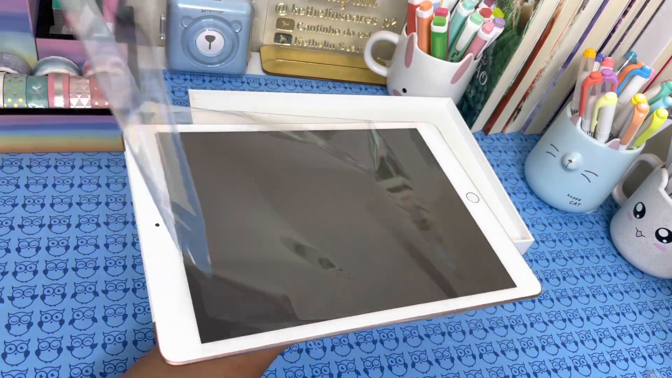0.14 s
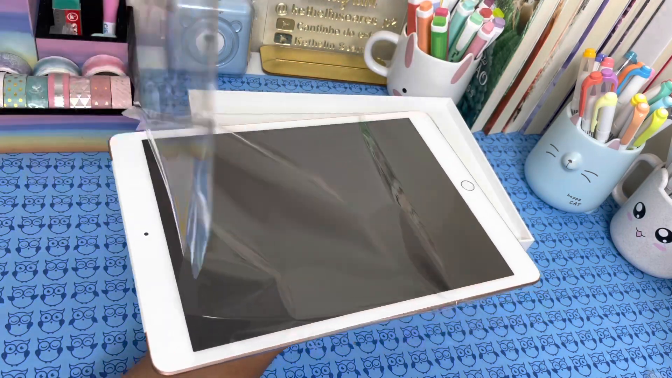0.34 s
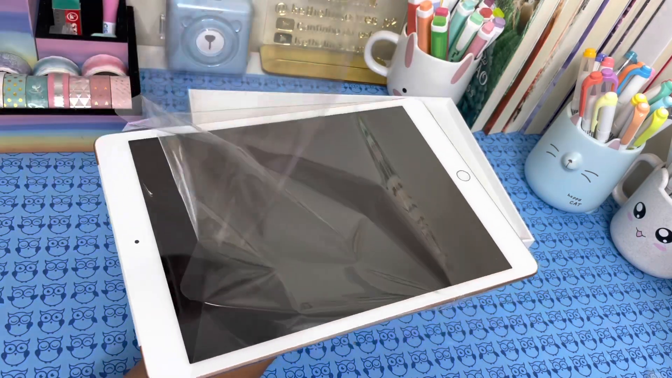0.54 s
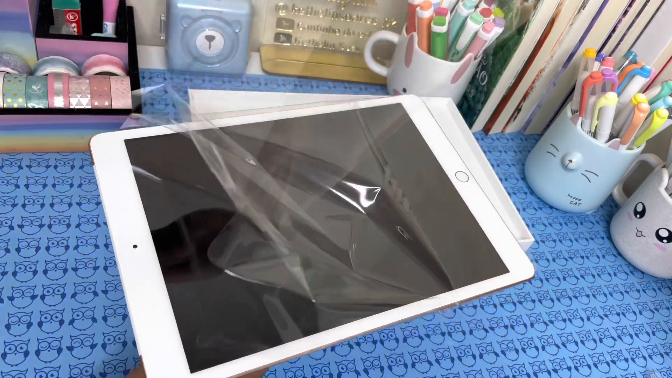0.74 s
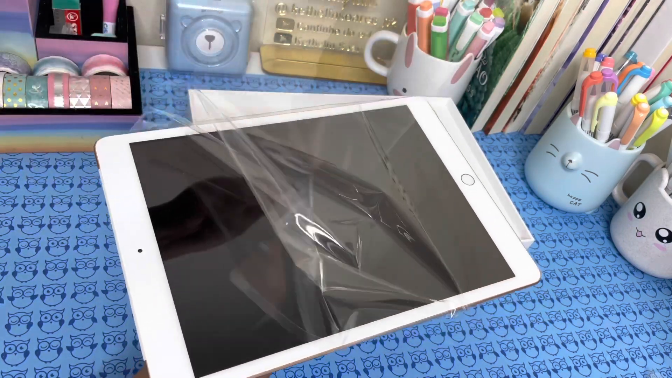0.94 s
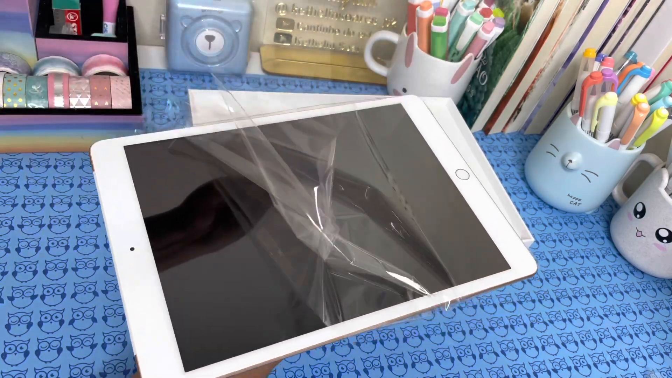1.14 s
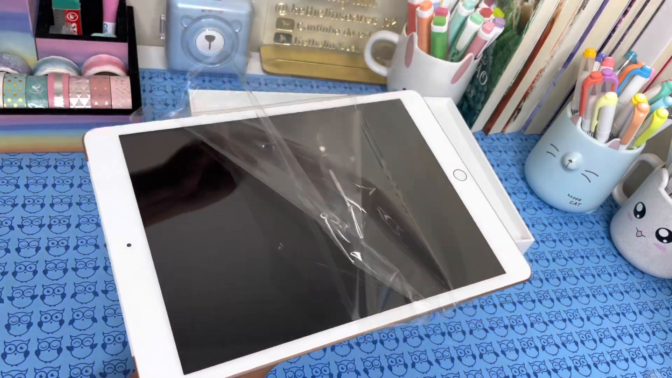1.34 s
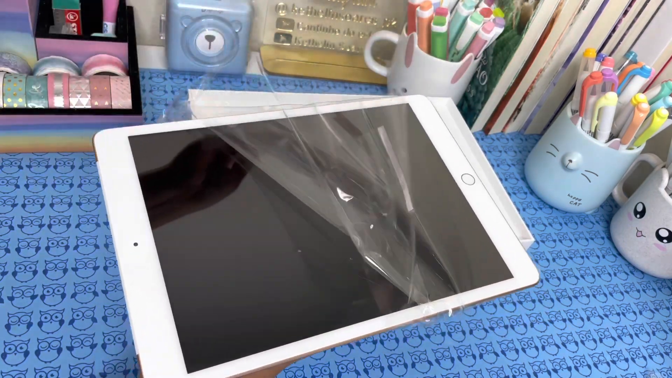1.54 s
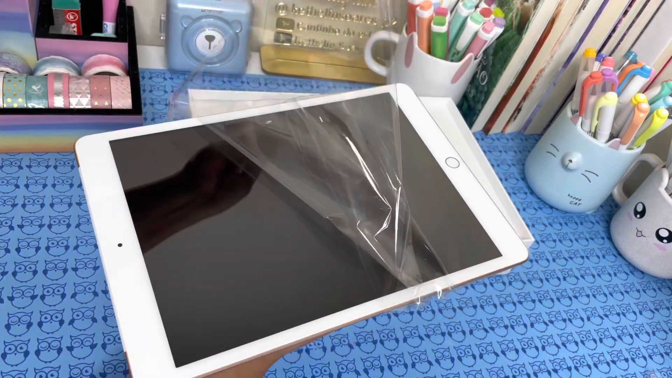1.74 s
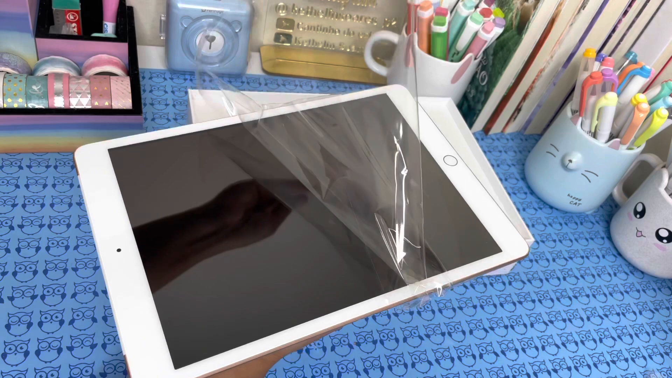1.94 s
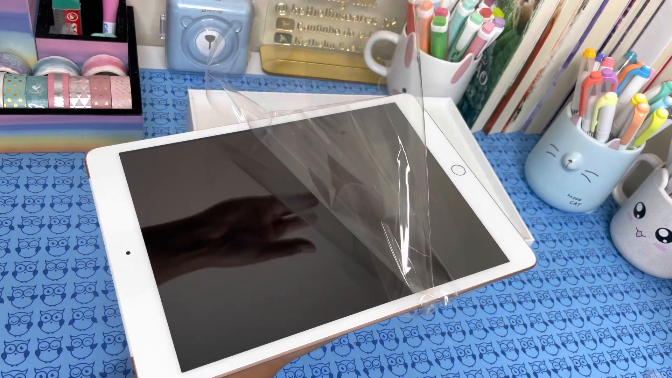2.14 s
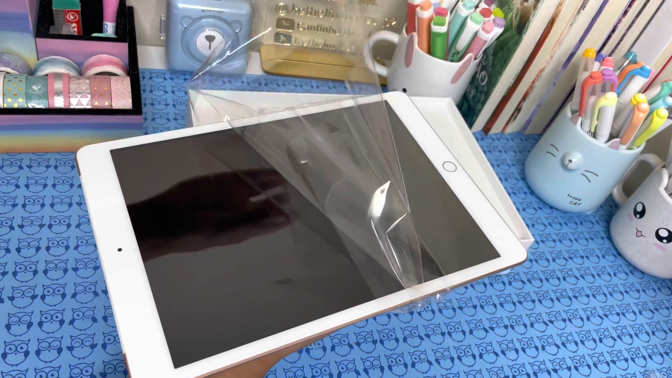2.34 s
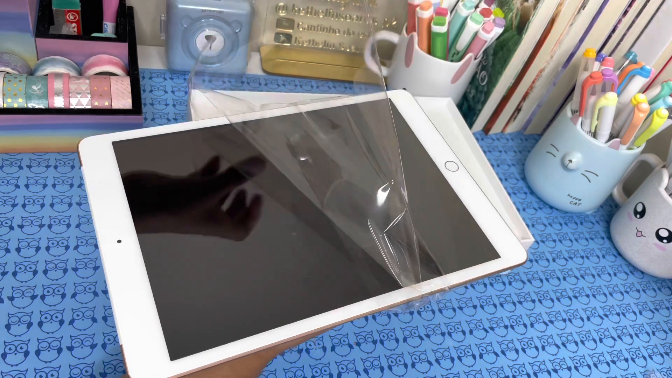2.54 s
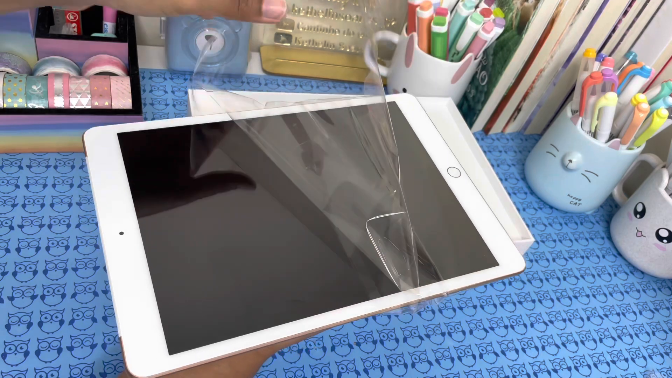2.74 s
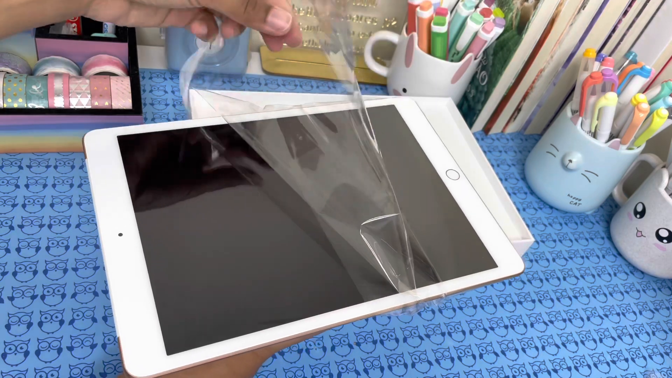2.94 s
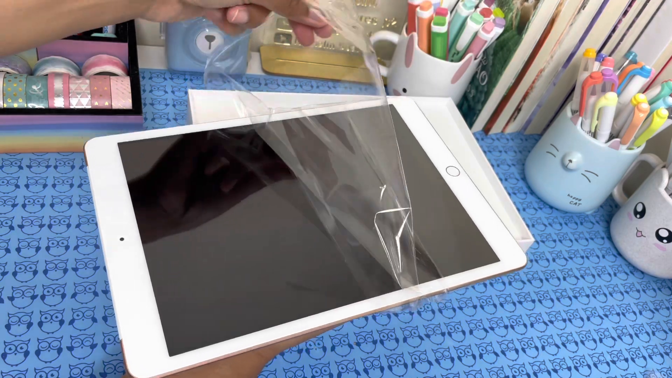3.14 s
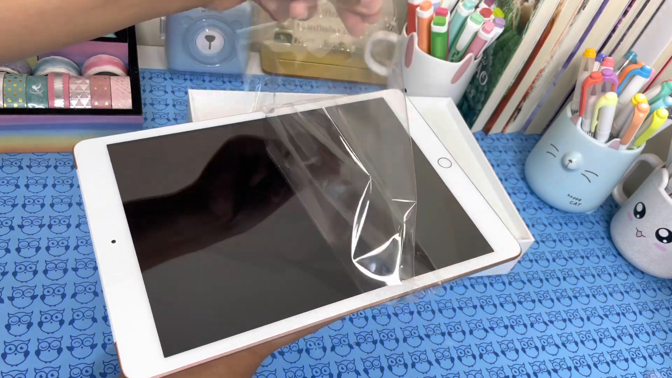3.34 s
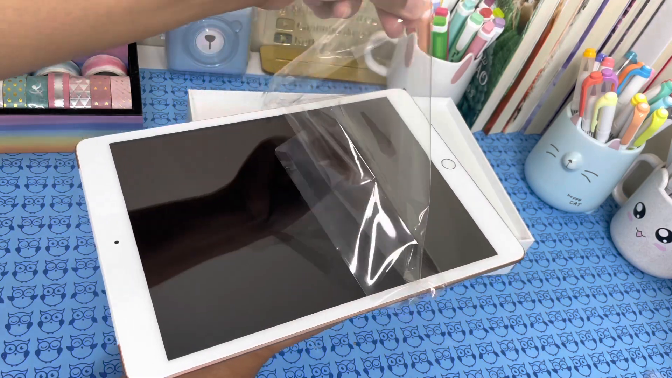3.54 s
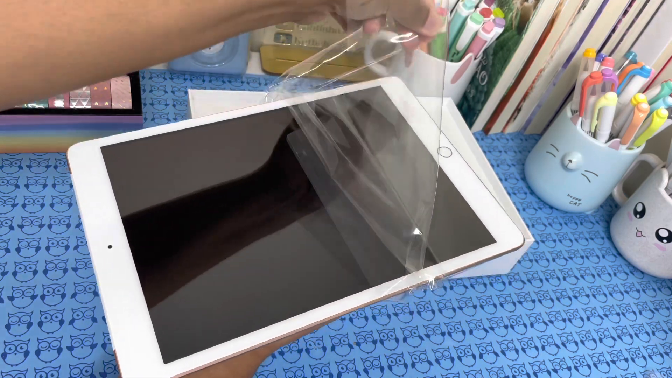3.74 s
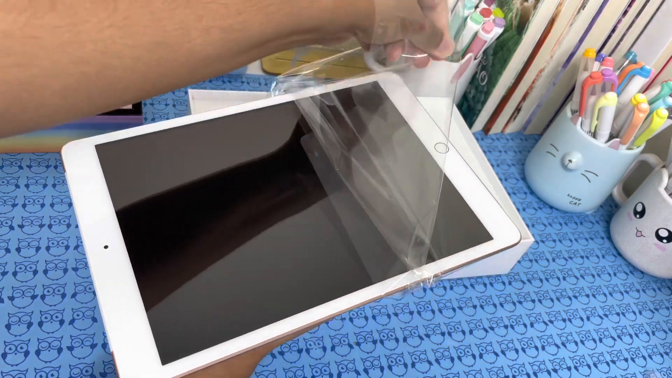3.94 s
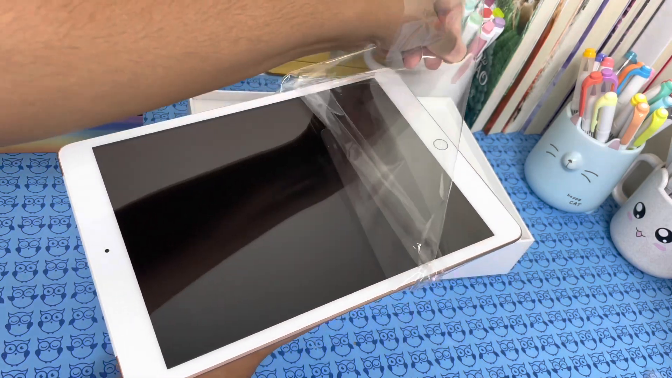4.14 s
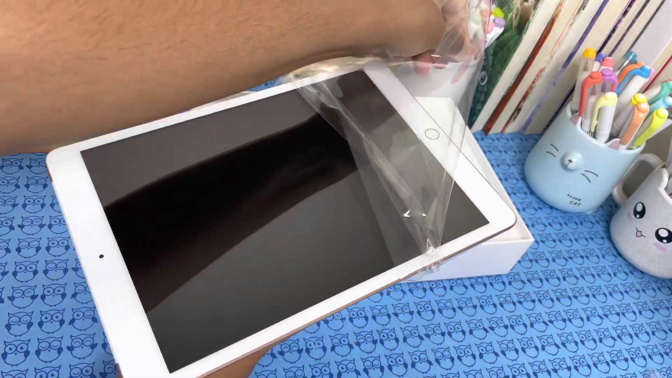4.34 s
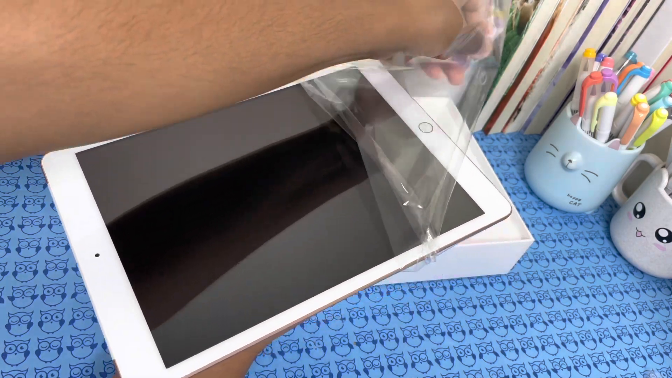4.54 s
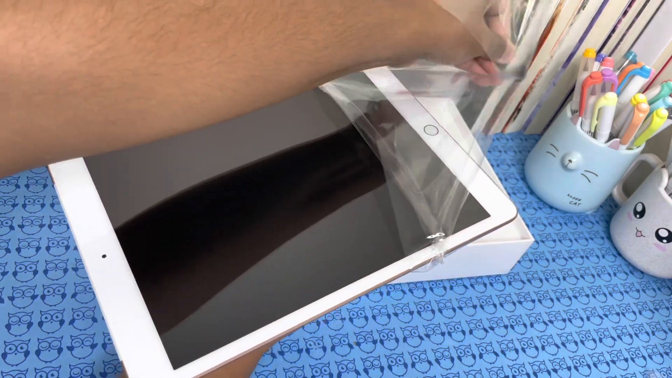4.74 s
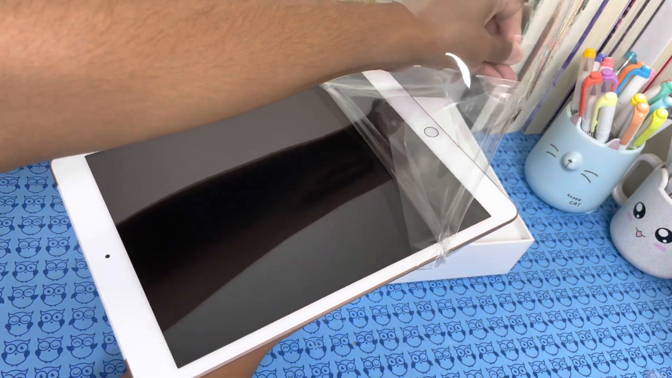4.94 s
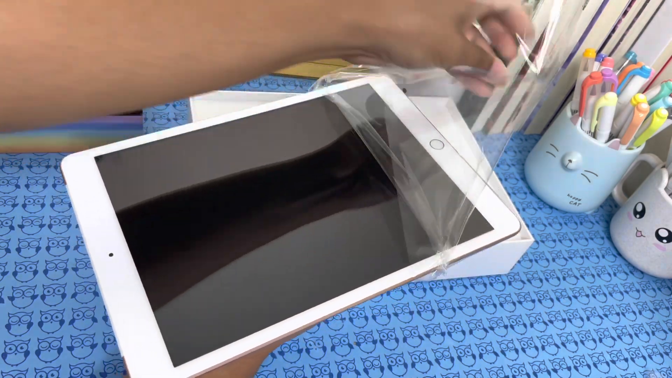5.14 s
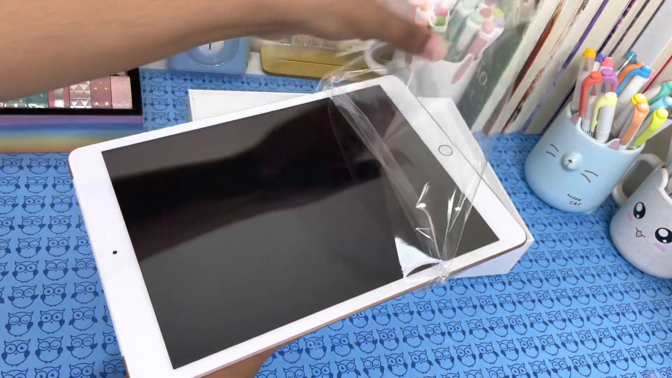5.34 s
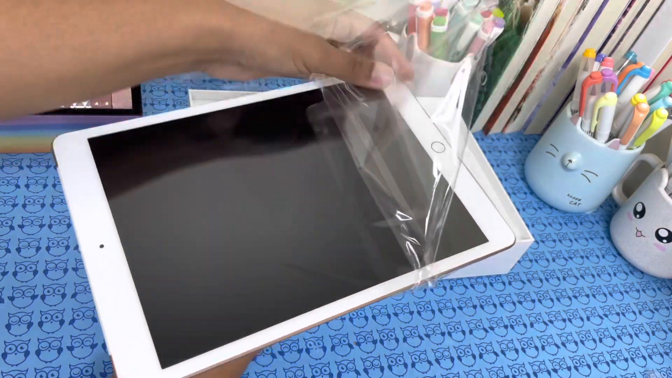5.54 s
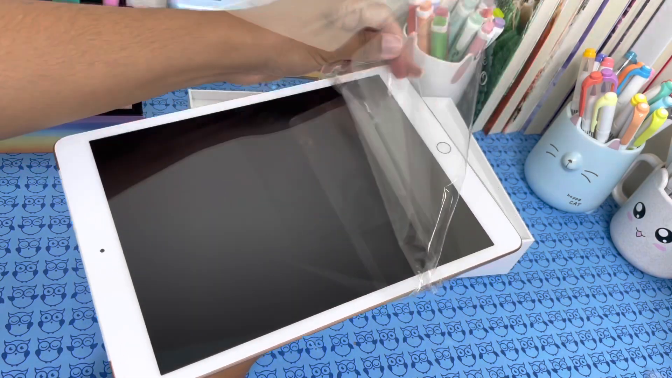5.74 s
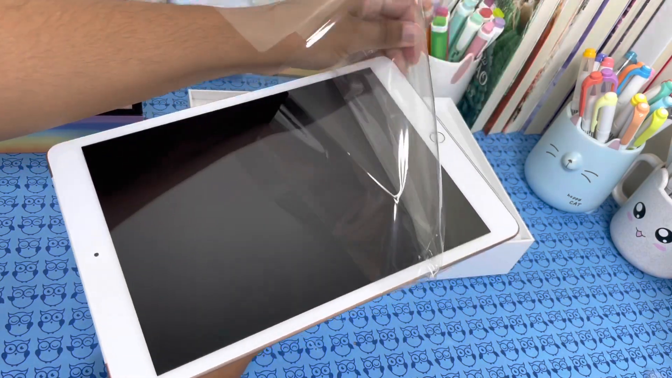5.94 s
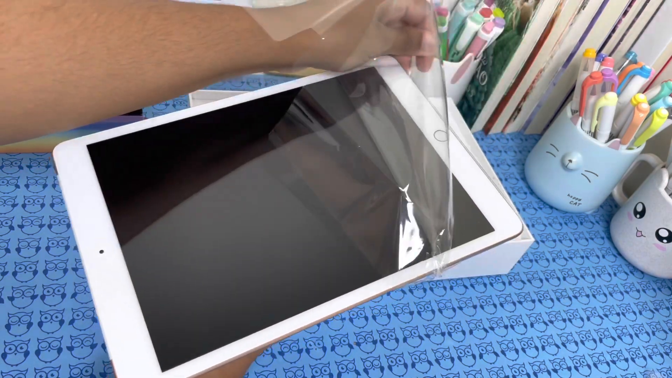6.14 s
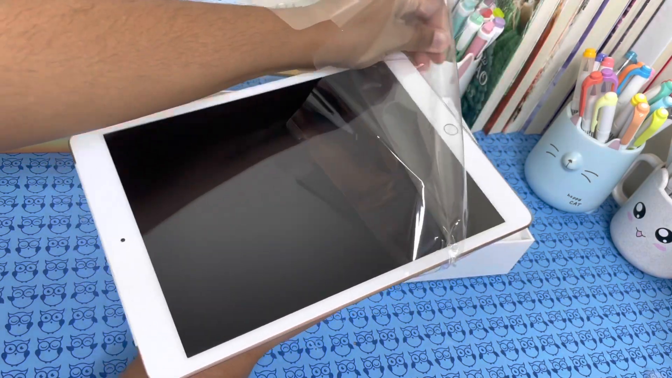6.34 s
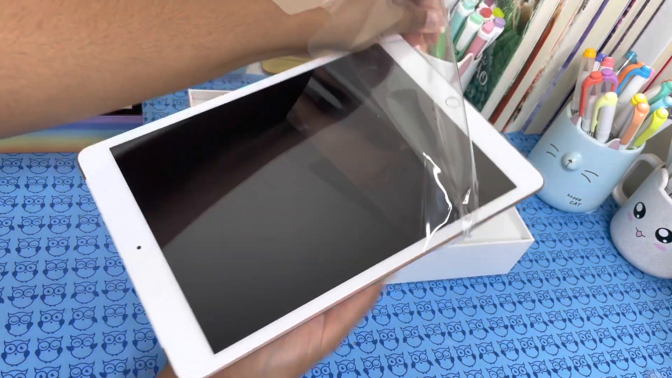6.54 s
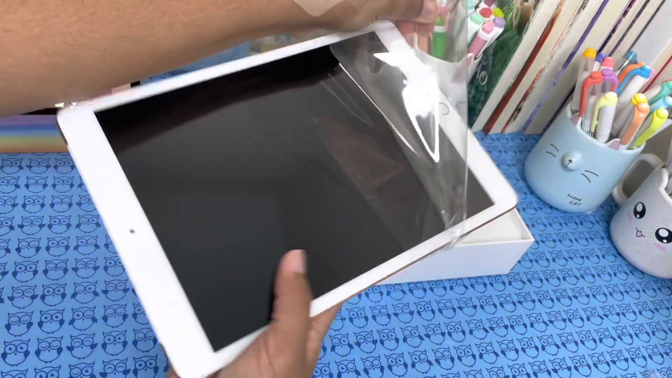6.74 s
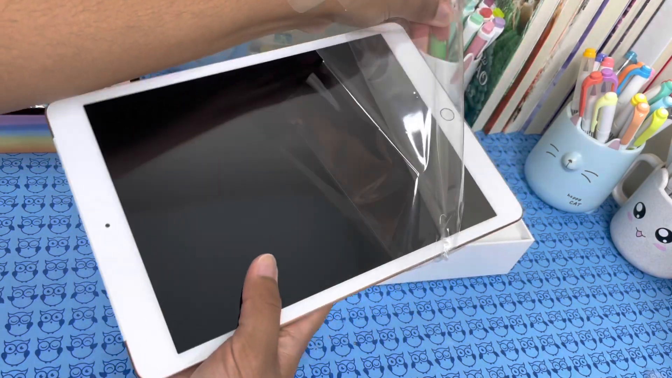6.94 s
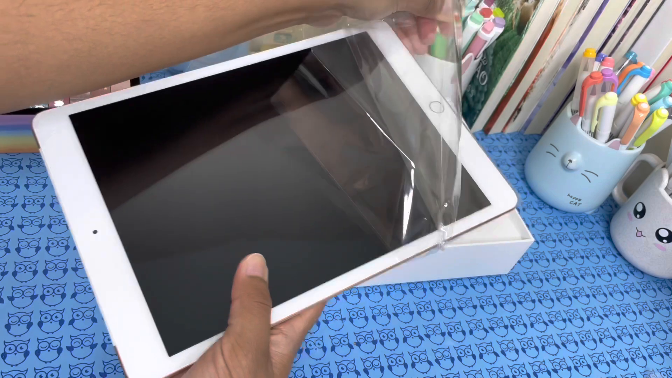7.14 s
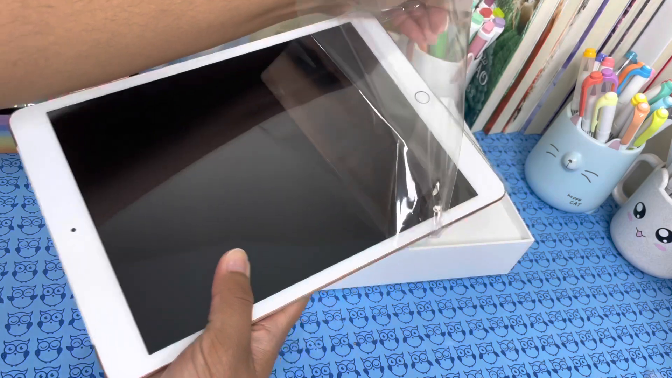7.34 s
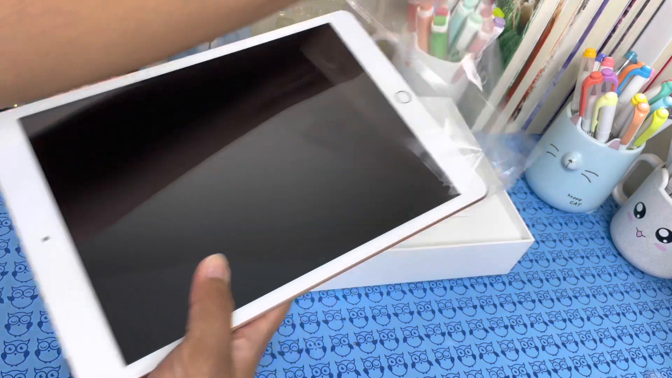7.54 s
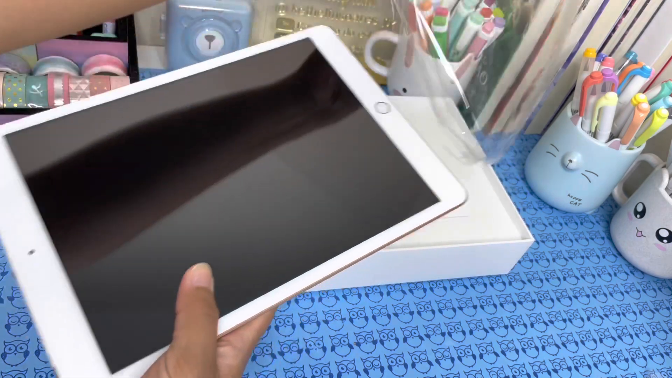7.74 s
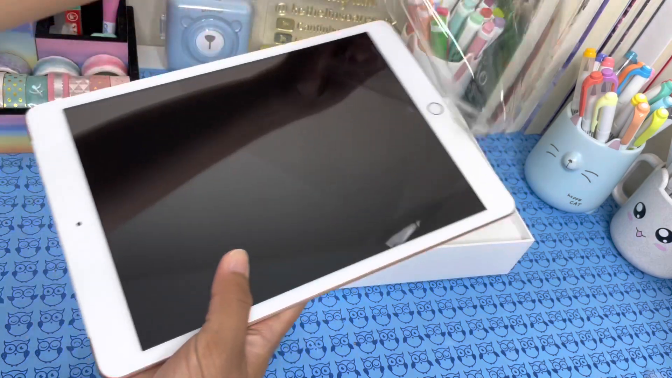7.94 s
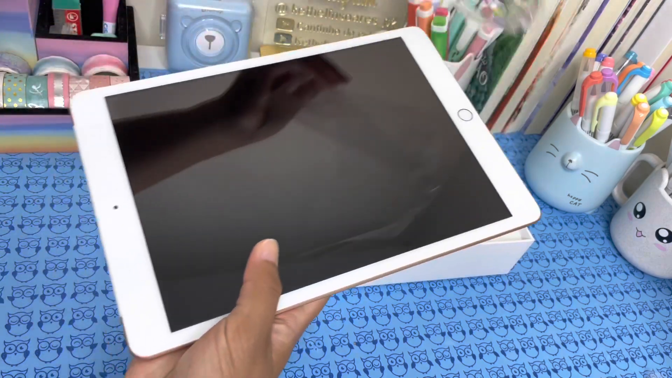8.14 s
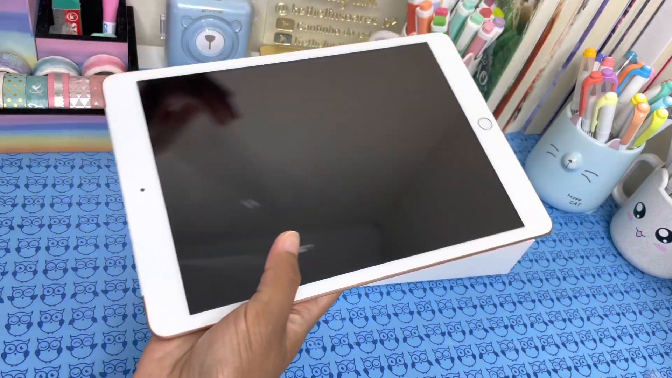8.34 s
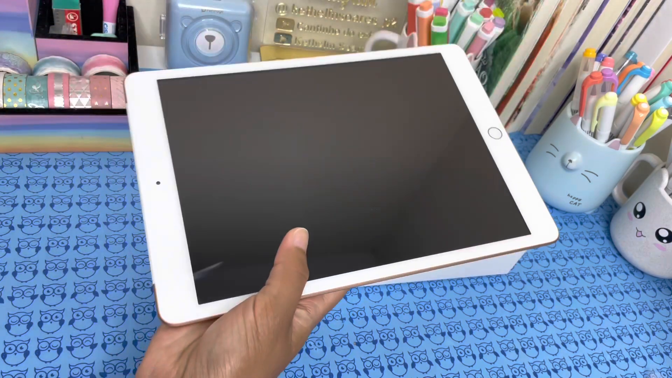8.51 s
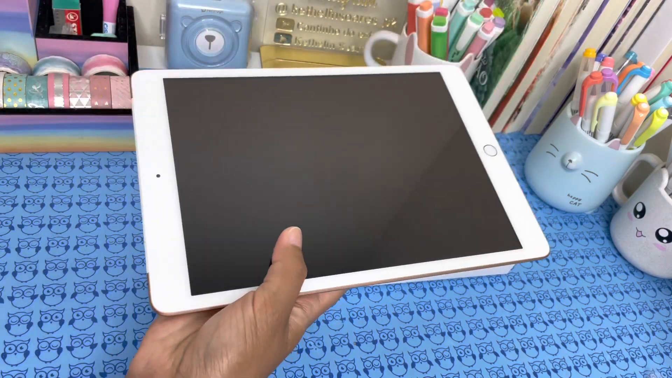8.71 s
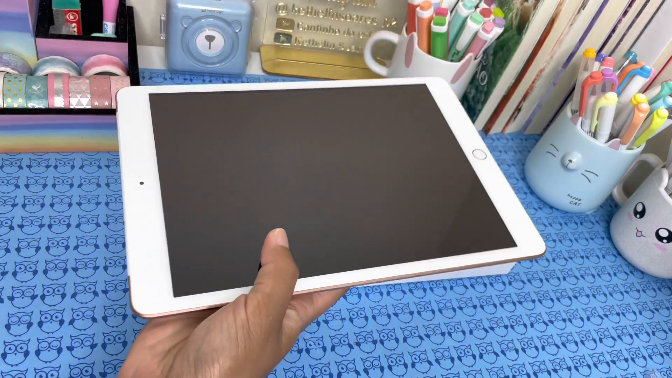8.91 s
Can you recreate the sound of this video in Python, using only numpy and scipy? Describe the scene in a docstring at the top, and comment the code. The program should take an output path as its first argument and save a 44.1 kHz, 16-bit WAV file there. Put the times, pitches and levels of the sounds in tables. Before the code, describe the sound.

Very close stereo sound of a thin plastic protective film peeled from a flat glass device in a small room. Crisp snaps and fine crackle build to a sharp cluster, drop to near quiet, then resume as dense, continuous crinkling with soft low flaps. After another lull, a last bright burst frees the sheet, leaving faint flutters over low hum.

```python
"""Snaps, crackle and hiss run together: a thin plastic film is peeled off a glass slab close by.
Each buckling crease makes a click, bursts of filtered noise and short ringing pops. Many small random
creases crackle between them, over noise whose level rises and falls as the sheet slides and bends.
The sheet also flaps with low thumps; a small room answers with noise tails, over a low wavering hum."""
import sys
import numpy as np
from scipy import signal
from scipy.fft import rfft, irfft, next_fast_len
from scipy.io import wavfile
from scipy.ndimage import uniform_filter1d, map_coordinates

SR = 44100
rng = np.random.default_rng(int(sys.argv[2]) if len(sys.argv) > 2 else 0)


def digitize_waveform(pressure):
    """Quantize a signal to 16-bit integers and store it at the path in sys.argv[1].

    Rows of a 2-D input are taken as channels; values are limited to [-1, 1].
    """
    field = np.atleast_2d(pressure).T
    bounded = np.clip(field, -1, 1)
    quanta = np.round(bounded * 32767).astype(np.int16)
    wavfile.write(sys.argv[1], SR, quanta)


N = 399973

# The large creases that buckle, before the level trims below.
# Each row: start in seconds, dull part in dB, body in dB, sparkle in dB.
SNAPS = [(0.04, -39, -25, -36), (0.2127, -46.5, -23.5, -17.5), (0.2781, -31, -28, -26),
         (0.33, -30.5, -30.5, -28), (0.4648, -41, -33, -28), (0.4935, -30.5, -17, -16),
         (0.6079, -35.5, -41, -48.5), (0.695, -25, -19.5, -27.5), (0.8739, -32.5, -20.5, -18),
         (0.9671, -50.5, -29, -17.5), (1.0236, -38.5, -36, -43.5), (1.04, -51, -38.5, -32),
         (1.096, -39.5, -28.5, -42), (1.1009, -33.5, -27, -40), (1.1383, -60, -19.5, -15.5),
         (1.2263, -47.5, -29, -33), (1.2803, -32.5, -26.5, -18.5), (1.3391, -28, -22, -31),
         (1.3515, -33, -21.5, -23), (1.3602, -25, -18.5, -27), (1.3675, -30, -13.5, -13.5),
         (1.3785, -28, -23.5, -18), (1.4839, -29, -23, -34.5), (1.5135, -36.5, -35, -30.5),
         (1.5655, -30, -28, -22), (1.585, -34, -25.5, -33.5), (1.6027, -32, -36, -25),
         (1.614, -34.5, -28, -22.5), (1.658, -54.5, -42, -40.5), (1.684, -22, -22, -21),
         (1.7596, -30.5, -25.5, -27.5), (1.7855, -40.5, -13.5, -14.5), (1.8098, -37, -22, -16),
         (1.8235, -25, -19, -25.5), (1.835, -25, -16.5, -12.5), (1.8529, -36, -15, -8),
         (1.868, -29.5, -23, -26.5), (1.8793, -22, -13.5, -17), (1.9298, -35.5, -26, -44),
         (2.2518, -49, -44.5, -56), (2.2597, -38, -35, -46), (2.3568, -38.5, -31, -35),
         (2.41, -38.5, -32, -38), (2.4821, -43.5, -38.5, -45.5), (2.532, -43.5, -44.5, -59),
         (2.672, -52.5, -58, -68), (2.9314, -42.5, -40, -61), (2.956, -44, -42.5, -44),
         (2.977, -41.5, -41.5, -47), (3.1133, -28.5, -26, -16), (3.21, -40, -23, -21),
         (3.2454, -26.5, -22, -32.5), (3.26, -48, -30, -18), (3.279, -38, -28.5, -42),
         (3.3273, -34.5, -31.5, -37.5), (3.4139, -35, -27, -37), (3.456, -30.5, -28.5, -24.5),
         (3.635, -48.5, -46, -59), (3.6746, -35, -27, -28), (3.7528, -50, -22.5, -17),
         (3.7993, -38, -35, -30), (3.8584, -39, -22.5, -33.5), (3.866, -52, -27.5, -24),
         (3.892, -39, -25.5, -29.5), (3.9935, -43.5, -25.5, -23), (4.0436, -45.5, -38, -38),
         (4.0671, -65, -29.5, -37.5), (4.194, -50, -32, -26.5), (4.214, -31.5, -27.5, -41),
         (4.224, -41.5, -30, -41), (4.2556, -36, -33, -52.5), (4.27, -32, -21.5, -22),
         (4.2964, -37, -25.5, -27.5), (4.301, -34.5, -20.5, -18.5), (4.3413, -32.5, -29, -32),
         (4.35, -50, -26, -27.5), (4.3613, -33, -20.5, -22), (4.3963, -26.5, -25, -27),
         (4.442, -50, -23.5, -17), (4.4569, -31, -22, -22), (4.4925, -31.5, -30, -50),
         (4.5074, -45.5, -37, -26.5), (4.549, -28.5, -19.5, -12), (4.56, -33.5, -22, -24),
         (4.6346, -42, -17, -19), (4.6654, -55, -28, -23), (4.7083, -27, -19, -27.5),
         (4.7571, -36.5, -21, -23), (4.7868, -40.5, -31, -32), (4.797, -43.5, -20, -24),
         (4.805, -47.5, -37, -28), (4.847, -48, -26, -25), (4.8523, -40, -29, -23),
         (4.8715, -29.5, -19, -18.5), (4.891, -54, -29, -38.5), (4.9146, -32, -23.5, -29.5),
         (4.945, -40.5, -31, -24), (5.0056, -24, -22.5, -18), (5.043, -29, -22, -32),
         (5.08, -32.5, -23, -31.5), (5.1208, -27.5, -19.5, -26), (5.145, -39.5, -28, -23),
         (5.167, -33, -32, -39), (5.215, -31, -25, -50), (5.2387, -35, -22, -25.5), (5.3107, -55, -44, -40),
         (5.3586, -37.5, -40, -58.5), (5.396, -44.5, -33.5, -39), (5.506, -52, -20.5, -20.5),
         (5.5777, -31, -25.5, -37), (5.6352, -36, -25.5, -25), (5.6739, -26.5, -16, -21.5),
         (5.7853, -41, -27, -28), (5.8263, -29.5, -13, -17), (5.8334, -18, -16, -17),
         (5.887, -34.5, -25, -21.5), (5.895, -20.5, -12.5, -21), (5.9107, -30.5, -15.5, -23),
         (5.9221, -28.5, -18.5, -20.5), (5.9912, -27.5, -17, -22), (6.1235, -49.5, -31, -22),
         (6.168, -43, -25.5, -25), (6.1818, -24, -14, -12.5), (6.2221, -44.5, -19, -17.5),
         (6.3247, -32, -20.5, -14.5), (6.5012, -46, -34, -31.5), (6.8443, -45, -37.5, -38),
         (6.954, -39, -33, -38), (6.9663, -35, -29.5, -25.5), (7.0015, -29, -31.5, -26),
         (7.0134, -34, -24.5, -15.5), (7.0433, -42.5, -33, -45), (7.1374, -37, -33, -33.5),
         (7.1771, -27, -16.5, -25), (7.1882, -26.5, -27, -19.5), (7.2022, -25.5, -15, -16),
         (7.2323, -33.5, -26.5, -20), (7.291, -37.5, -31, -26.5), (7.3421, -42, -39, -24),
         (7.363, -26, -22, -33), (7.3805, -33.5, -21.5, -19), (7.3977, -33.5, -14, -9.5),
         (7.4192, -37.5, -31, -18), (7.5027, -42, -18.5, -23), (7.532, -27, -18, -17),
         (7.5589, -26, -21.5, -23.5), (7.5715, -24, -18.5, -19.5), (7.77, -40.5, -40, -64),
         (7.867, -54, -48.5, -60), (8.0011, -60, -69, -66), (8.2222, -52.5, -44, -50),
         (8.487, -43.5, -34, -46), (8.7706, -53, -40, -51), (8.952, -75, -54, -32.5)]
# Tone colours of a snap's body, of its sparkle and of the bending sheet.
# Each row: frequency in Hz, relative level in dB.
BODY_COLOUR = [(1500, -18), (2600, 0), (7200, -3), (9000, -14), (10500, -38.5)]
SPARKLE_COLOUR = [(8500, -10), (10000, 2), (12200, 1.5), (13800, -3.5), (15500, -26)]
FLEX_COLOUR = [(300, -17.5), (600, -4), (1200, 1.5), (2200, -2), (5000, -26)]
# Neighbouring creases give way soon after a snap.
AFTER_S, AFTER_DB, AFTER_SPREAD_DB = 0.016, -15, 2.5
# The noise of the sheet sounds this much later, and its bending waves lag by this many cycles.
RUN_S, LAG_CYCLES = 0.0004, 0.7


def film():
    """Large creases and their aftershocks over a crackle of small ones that follows the bed levels."""
    t = np.arange(N) / SR
    snap_s, dull_db, body_db, sparkle_db = np.transpose(SNAPS)
    luck = rng.random((len(snap_s), 6))

    # two aftershocks follow each snap
    wait = 0.0044 - AFTER_S * np.log(luck[:, :2].T + 0.01)
    after_s = np.clip(snap_s + wait, 0, t[-1]).ravel()
    after_gain_db = AFTER_DB + AFTER_SPREAD_DB * np.log(luck[:, 2:4].T + 0.01)

    def weaker(level_db):
        """Aftershock levels, drawn around those of their snaps and mostly far below."""
        return (level_db + after_gain_db).ravel()

    small = rng.random((2000, 4))
    tick_s = small[:, 0] * (N - 1) / SR
    size_db = -4 * np.log(small[:, 1] + 0.12)  # many faint creases, few strong
    tick_slide_db, tick_flex_db = bed_levels(tick_s)
    tick_body_db = tick_slide_db + size_db - 7
    tick_sparkle_db = tick_body_db + 10 * small[:, 3] - 5
    tick_flex_db = tick_flex_db + size_db + 8 * small[:, 2] - 8.0

    grit_db = 0.8 * wobble(40)
    slide_db, flex_db = np.array(bed_levels(t)) + grit_db

    every_s = np.r_[snap_s, after_s, tick_s]
    body = band(every_s, np.r_[body_db + 1.5, weaker(body_db), tick_body_db], slide_db - 5.5, BODY_COLOUR,
                burst_s=0.0084, shiver_s=0.052, shiver_db=-11, room_s=0.3, room_db=-19.0)
    sparkle = band(every_s, np.r_[sparkle_db + 3.5, weaker(sparkle_db), tick_sparkle_db],
                   slide_db - 7.5, SPARKLE_COLOUR,
                   burst_s=0.003, shiver_s=0.029, shiver_db=-6, room_s=0.24, room_db=-22.5)
    bend = band(every_s, np.r_[dull_db + 2.5, weaker(dull_db), tick_flex_db], flex_db - 4.5, FLEX_COLOUR,
                burst_s=0.015, shiver_s=0.13, shiver_db=-13.5, room_s=0.27, room_db=-15.0)

    brightness_db = np.clip(body_db - dull_db, 0, 18)
    low_hz = 620 * amp(0.688 * brightness_db) * 1.432 ** luck[:, 4]  # duller snaps pop lower
    bend[0] += pops(snap_s, dull_db + 12.5, low_hz, cycles=11.1)
    bend[0] += pops(snap_s, body_db - 0.5, 2600 * 2.5 ** luck[:, 5], cycles=43)

    sheet = bending_delay(body + sparkle + bend + slaps(snap_s, dull_db, flex_db))
    sheet[0] += flaps()
    return sheet


def bending_delay(x):
    """Bending waves run slower at low pitch, so low tones arrive last."""
    def delay(hz):
        cycles = RUN_S * hz + LAG_CYCLES * np.log1p(hz / 100)
        return np.exp(-2j * np.pi * cycles)
    return filtered(x, delay)


CLICK_DB = -2  # energy in the instant of buckling against the burst that follows


def band(s, db, bed_db, colour, burst_s, shiver_s, shiver_db, room_s, room_db):
    """One band of the film: lead-in, click, burst, the sheet's shiver and room tail, on a noise bed."""
    power = dying(s, db, burst_s)
    power += dying(s, db + shiver_db, shiver_s)
    power += dying(s, db + room_db, room_s)
    # lead-in: a short soft noise swell before each click, made as a decay played backwards
    power += dying((N - 1) / SR - s, db - 16.5, 0.0072)[::-1]
    power = np.abs(uniform_filter1d(power, size=44))  # a crease needs a moment to run

    # row 0 is shared by the two microphone ports, row 1 is unshared
    sound = np.sqrt(power + amp(2 * bed_db)) * rng.standard_normal((2, N))
    burst_size = np.sqrt(burst_s * SR / np.log(1e6))
    sign = np.sign(rng.standard_normal(len(s)))
    click = amp(db + CLICK_DB) * burst_size * sign
    sound[0] += np.bincount(np.round(s * SR).astype(int), click, N)[:N]
    return coloured(patchy(sound, depth_db=3), colour)


def dying(s, db, t60):
    """Power that jumps at each moment and falls 60 dB in t60 seconds."""
    kicks = np.bincount(np.round(s * SR).astype(int), amp(2 * db), N)[:N]
    return signal.lfilter([1], [1, -amp(-120 / (t60 * SR))], kicks)


def patchy(x, depth_db):
    """Random patches of louder and softer sound, spread over time and pitch."""
    z = signal.stft(x, nperseg=256)[2]
    field = rng.standard_normal(z.shape[1:])
    field = uniform_filter1d(field, size=5, axis=0)  # smooth over pitch
    field = uniform_filter1d(field, size=3, axis=1)  # smooth over time
    gain = amp(depth_db * field / field.std())
    gain = gain / np.sqrt(np.mean(gain ** 2))
    return signal.istft(z * gain, nperseg=256)[1][:, :N]


def pops(s, db, hz, cycles):
    """A buckling patch rings for a few cycles; its pitch sags as the slower bending waves arrive."""
    out, t = np.zeros(N + SR), np.arange(SR // 16) / SR
    for at, level, f in zip(s, db, hz):
        fade = amp(level - 60 * t * f / cycles)  # down 60 dB after this many cycles
        attack = 1 - np.exp(-t * f)
        ring = np.sin(2 * np.pi * (f * t - 0.63 * np.exp(-f * t / 2)))
        out[round(at * SR):][:len(t)] += fade * ring * attack
    return out[:N]


# Level of the sliding and bending noise over time, with a brief near-silence at 8.11 s.
# Each row: time in seconds, slide level in dB, flex level in dB.
BED_LEVELS = [(0, -50.5, -53.5), (0.44, -55, -64.5), (0.8, -49.5, -52), (1.2, -58.5, -51), (1.8, -48, -50),
              (2.12, -57, -64), (2.4, -59, -46), (2.65, -71.5, -79), (2.86, -71, -62.5),
              (3.03, -48.5, -53.5), (3.6, -59, -55.5), (4.15, -56, -51.5), (4.45, -40, -46),
              (4.9, -51, -55), (5.45, -54.5, -47.5), (5.9, -51.5, -45), (6.3, -49.5, -52),
              (6.67, -58.5, -74), (6.93, -60, -65.5), (7.3, -42.5, -50.5), (7.68, -55, -54),
              (8.07, -62.5, -71.5), (8.11, -83, -100), (8.17, -68, -86), (9.07, -55.5, -55.5)]
# The slack sheet flutters softly.
# Each row: middle in seconds, length in seconds, slide peak in dB, flex peak in dB.
FLUTTERS = [(2.558, 0.049, -59, -47.5), (2.723, 0.027, -62, -50), (2.792, 0.0086, -70, -50.5),
            (2.854, 0.018, -74, -49.5), (6.78, 0.056, -73.5, -57.5), (7.745, 0.05, -46, -49),
            (8.268, 0.011, -44.5, -52.5), (8.353, 0.015, -52, -75), (8.525, 0.035, -72, -57.5),
            (8.663, 0.017, -38.5, -69), (9.003, 0.089, -43.5, -74)]


def bed_levels(t):
    """Slide and flex levels in dB: the level curve plus the bell-shaped flutters."""
    when, *levels = np.transpose(BED_LEVELS)
    at, length, *peaks = np.transpose(FLUTTERS)
    bells = np.exp(-(2 * (t[:, None] - at) / length) ** 2)
    both = []
    for db, peak_db in zip(levels, peaks):
        power = amp(2 * np.interp(t, when, db)) + bells @ amp(2 * peak_db)
        both.append(10 * np.log10(power))
    return both


# The sheet flaps against the slab, before the level trims below.
# Each row: start in seconds, level in dB, base pitch in Hz that the sweep passes through.
THUMPS = [(1.024, -33, 237), (1.082, -33, 166), (1.156, -32, 242), (1.558, -30, 420), (1.684, -46, 794),
          (3.248, -37, 307), (4.548, -29.5, 310), (4.719, -32.5, 410), (5.216, -27, 277), (5.83, -25, 565),
          (5.989, -27.5, 336), (7.362, -32, 220), (8.222, -41.5, 474)]


def flaps():
    """A flap sweeps down from a tick to a knock within two or three cycles."""
    out = np.zeros(N + SR)
    for at, level, f in zip(*np.transpose(THUMPS)):
        turns = np.arange(SR // 16) / SR * f
        swell = turns * np.exp(-turns / 0.84)
        sweep = np.sin(2 * np.pi * (0.8 * turns - 1.4 * np.exp(-turns)))  # 2.2 f down to 0.8 f
        out[round(at * SR):][:len(turns)] += amp(level + 11) * swell * sweep
    return out[:N]


# Tone colour of the air pushed out under the sheet. Each row: frequency in Hz, relative level in dB.
SLAP_COLOUR = [(70, -17.5), (150, -2.5), (400, 3), (900, -28.5)]


def slaps(snap_s, dull_db, flex_db):
    """Air pushed out under the sheet makes a low noise burst at each flap and each snap."""
    flap_s, flap_db, _ = np.transpose(THUMPS)
    return band(np.r_[flap_s, snap_s], np.r_[flap_db - 3, dull_db - 13], flex_db - 9.0, SLAP_COLOUR,
                burst_s=0.019, shiver_s=0.21, shiver_db=-9, room_s=0.16, room_db=-12.0)


# A low room resonance. The single row: frequency in Hz, width in Hz, peak gain in dB.
BOOM = (123, 3, 10.9)


def room_boom(sheet):
    """A low room mode stirred by the film: a narrow resonance."""
    hz, width, db = BOOM

    def mode(f):
        push = 1j * f * width
        return amp(db) * push / (hz * hz - f * f + push)
    return filtered(sheet, mode)


# Tone colour of the room noise. Each row: frequency in Hz, relative level in dB.
RUMBLE = [(25, -36.5), (45, -25.5), (60, -4.5), (75, -6.5), (125, -5), (180, -16), (3000, -46.5),
          (16000, -74)]


def hum():
    """A low hum, wavering in level and phase, over faint room noise."""
    t = np.arange(N) / SR
    level = amp(-51.0 + 1.2 * wobble(25))
    tone = level * np.sin(2 * np.pi * 59.5 * t + 0.67 * wobble(20.0))
    noise = amp(-62) * coloured(rng.standard_normal((2, N)), RUMBLE)
    return noise + tone * [[1], [0]]  # the tone is shared by both ports


# How far the left port is ahead of the right. Each row: frequency in Hz, lead in radians.
LEAD = [(1700, 0.3), (3100, 1.3), (5000, 0.8), (5800, -1.5), (7600, -2.9), (9500, -3.4), (12000, -6.1)]
# How much louder the left port is. Each row: frequency in Hz, left over right in dB.
TILT = [(110, -0.5), (300, 2.5), (4400, 2.5), (8100, 0.5)]
# How alike the two ports sound. Each row: frequency in Hz, likeness where 1 is the same sound.
ALIKE = [(60, 1), (1000, 0.44), (3000, 0.083), (8500, 0.71)]


def ports(pair):
    """A shared and an unshared sound reach the two ports with a phase and level step."""
    def mix(hz):
        turn = np.arccos(np.clip(along(ALIKE, hz), -1, 1)) / 2
        return np.array([np.cos(turn), np.sin(turn)])

    def steps(hz):
        step = amp(along(TILT, hz) / 2) * np.exp(0.5j * along(LEAD, hz))
        return np.array([step, 1 / step])
    shared, own = filtered(pair, mix)
    return filtered(np.array([shared + own, shared - own]), steps)


def amp(db):
    """Turn dB into gain."""
    return 10 ** (np.asarray(db) / 20)


def along(points, hz):
    """Read a curve of (Hz, value) points on a log frequency axis."""
    f, v = np.transpose(points)
    return np.interp(np.log(hz + 1), np.log(f + 1), v)


def filtered(x, response):
    """Shape the spectrum of x with a complex response of frequency."""
    m = next_fast_len(N + 8192)
    return irfft(rfft(x, m) * response(np.fft.rfftfreq(m, 1 / SR)), m)[..., :N]


def coloured(x, spectrum):
    """Pass x through a colour that keeps the level of white noise."""
    power = amp(2 * along(spectrum, np.linspace(0, SR / 2, num=2000)))
    level = np.sqrt(np.mean(power))
    return filtered(x, lambda hz: amp(along(spectrum, hz)) / level)


def wobble(rate):
    """A smooth random curve with rate knots a second."""
    knots = rng.standard_normal(int(N * rate / SR) + 4)
    return map_coordinates(knots, [np.arange(N) * rate / SR])


def scene():
    """Film, the room mode that it stirs and the hum, at the two ports."""
    sheet = film()
    return ports(sheet + room_boom(sheet) + hum())


TOP_HZ = 16750  # top of the sound's range


def record(dry):
    """Loud peaks saturate softly; the deepest bass and everything above TOP_HZ are removed."""
    out = dry / (1 + (dry / 0.85) ** 4) ** (1 / 4)
    out = filtered(out, lambda hz: (1j * hz / (30 + 1j * hz)) ** 2)  # bass cut below 30 Hz
    return filtered(out, lambda hz: amp(-200 * np.clip(hz / TOP_HZ - 1, 0, 1) / 0.01))


dry = scene()
out = record(dry)
digitize_waveform(out)
```